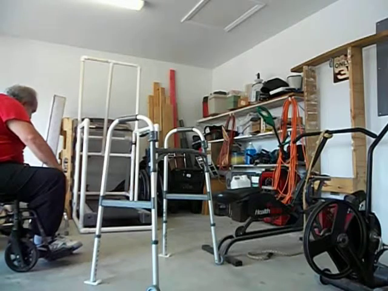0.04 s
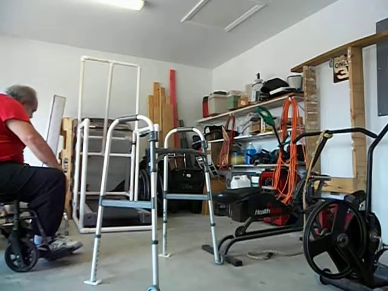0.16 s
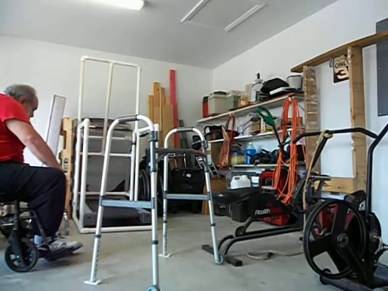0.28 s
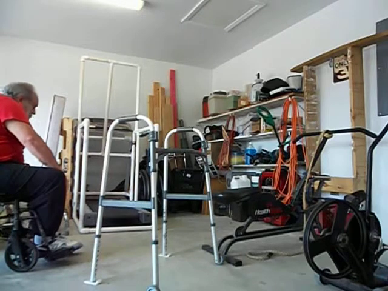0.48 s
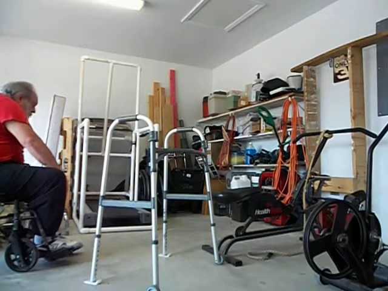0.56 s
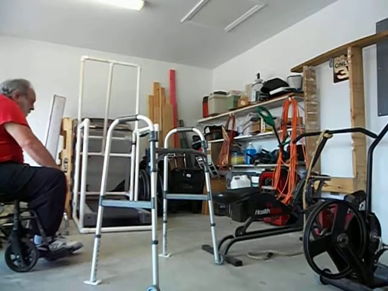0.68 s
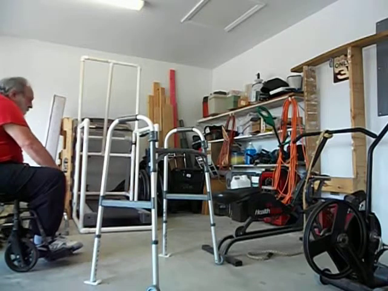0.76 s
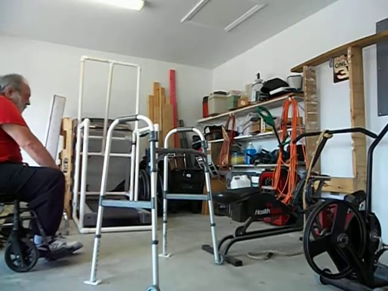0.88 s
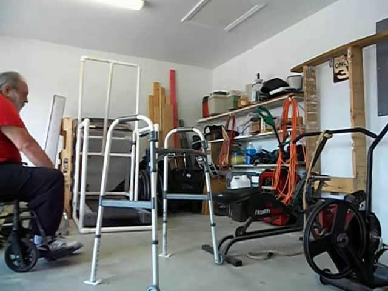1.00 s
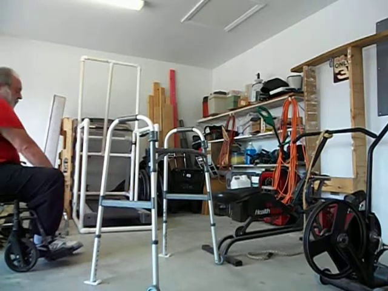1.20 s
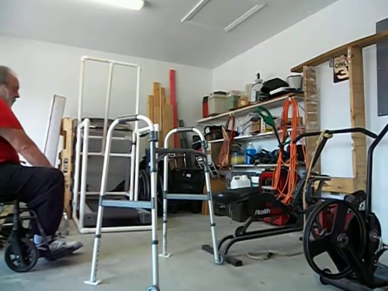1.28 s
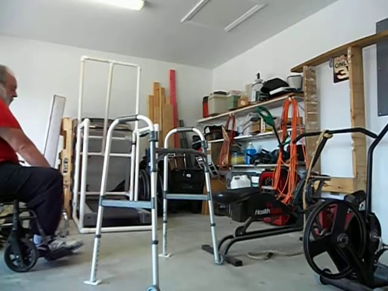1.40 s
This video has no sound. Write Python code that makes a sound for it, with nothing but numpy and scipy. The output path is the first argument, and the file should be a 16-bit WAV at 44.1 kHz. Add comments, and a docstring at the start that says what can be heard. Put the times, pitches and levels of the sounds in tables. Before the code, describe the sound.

A hollow metal clunk from a wheelchair, then knocks and clicks over steady humming.

```python
"""In a garage, a wheelchair is shifted a few metres away: a hollow metal clunk, then frame knocks and
clicks of loose fittings. Each contact is an impulsive source, heard as a short crack, and may excite
the damped normal modes of the tubing and fittings; the footrests take blunt blows. Reflections in the
hard room merge into a reverberant wash, over a steady low motor hum and air noise."""
import sys
import numpy as np
from scipy import signal
from scipy.fft import rfft, irfft
from scipy.io import wavfile
from scipy.ndimage import uniform_filter1d

SR = 44100
rng = np.random.default_rng(int(sys.argv[2]) if len(sys.argv) > 2 else 0)


def dump_mix(stems):
    """Bounce the given channels to the path in sys.argv[1] as a 16-bit WAV at rate SR."""
    frames = np.atleast_2d(stems).T  # one column per channel
    limited = np.clip(frames, -1, 1)  # hard clip at full scale
    pcm = np.round(limited * 32767).astype(np.int16)
    wavfile.write(sys.argv[1], SR, pcm)


N = 63945

# Line spectrum of the motor: f/Hz, level/dB
HUM_LINES = [(73, -49), (146.8, -41), (220.7, -46), (295.5, -44), (360.7, -50)]
# Spectrum of the air noise: f/Hz, relative level/dB
AIR_SPECTRUM = [(15, -50.5), (25, -20.5), (49, -7), (91, -12.5), (130, -5.5), (247, -10), (371, -1),
                (570, -10.5), (918, -12.5), (1110, -14.5), (1310, -14), (2170, -19), (2750, -21),
                (5630, -32), (7500, -33.5), (9750, -104.5), (16500, -120)]
# Reverberation time of the garage: f/Hz, T60/s
REVERB_TIMES = [(200, 0.44), (800, 0.38), (2500, 0.55), (6000, .45)]
# Lag of the left channel: f/Hz, delay/samples
LEFT_DELAY = [(170, .2), (300, 2.4), (1000, 2.6), (7000, 2.8)]
# Steel-on-steel ticks: t/s, level/dB
STEEL_TICKS = [(0.201, -29), (0.5373, -46.5), (0.694, -27), (0.705, -24), (.891, -33)]
# Bands of the contact spectra: f/Hz
CONTACT_BANDS = [220, 700, 1200, 2600, 5600, 7200]
# Contacts of the loose fittings: t/s, then level/dB in each of CONTACT_BANDS
FITTING_CONTACTS = [ (0.198, -30, -28, -40, -34, -35, -31), (.208, -29.5, -40.5, -30.5, -25, -27, -23),
                    (.222, -40, -31.5, -33.5, -23, -27, -32), (.235, -33.5, -25, -19.5, -20, -43, -47.5),
                    (0.535, -33.5, -31, -30, -29.5, -29.5, -34),
                    (0.544, -27, -23.5, -22.5, -35.5, -22, -34.5),
                    (.624, -30.5, -29.5, -31, -35.5, -39.5, -44), (.634, -29, -22, -24, -30.5, -29, -43.5),
                    (0.69, -31, -31, -23.5, -29, -28.5, -39),
                    (.706, -56.5, -25, -47.5, -26.5, -29.5, -29.5),
                    (.881, -48, -31, -40.5, -34.5, -42.5, -41.5), (.895, -53, -47.5, -36.5, -30, -42, -47),
                    (0.955, -34, -37, -36, -33, -38, -46.5)]
# Colouring common to all cracks: f/Hz, gain/dB
CRACK_SPECTRUM = [(100, -11.5), (300, -0.5), (500, 3), (700, 6), (1200, 1.5), (1600, -0.5), (2300, -1.5),
                  (3300, 3), (4200, -1), (5200, 4.5), (6000, 8.5), (7000, 1), (8000, 10)]
# Normal modes of the hollow part, tube frame and steel fittings: f/Hz, level/dB, T60/s
HOLLOW_MODES = [(546.7, 5, 0.2), (504, -10, 0.75), (600, -7.5, 0.56), (867, -10.5, 0.31),
                (1337, -17.5, 0.35), (1331, -12.5, 0.36), (1534, -11.5, 0.28), (2050, -31, 0.3),
                (2115, -14, 0.38)]
TUBE_MODES = [(490.4, -0.5, 0.73), (636, 5, 0.2), (684, -16.5, 0.36), (737, -13.5, 0.068),
              (858, -4.5, 0.14), (963, -1, 0.12), (1101, -4.5, 0.23), (1200, 3, .25), (1367, -20, .35),
              (1600, -8.5, 0.34)]
STEEL_MODES = [(2600, 0, 0.34), (2980, -13, 0.35), (2880, -22, 0.39), (3760, -2, .2), (4960, 2, 0.24),
               (5530, 0.5, 0.33), (5940, 0.5, 0.5), (5820, 0.5, 0.36), (5910, -0.5, .5),
               (5740, -14.5, 0.41)]
# Impacts on the hollow part: t/s, level/dB, T60 factor
HOLLOW_CLUNKS = [(.199, -16.5, 1), (.217, -17.5, 0.63), (.2315, -19.5, 1)]
# Impacts on frame and fittings: t/s, level/dB, T60 factor, most excited f/Hz, fall-off/(dB per octave)
FRAME_KNOCKS = [(.544, -26, 1, 616, 2.5), (.633, -22.5, 1, 700, 5.5), (.886, -27.5, 1, 767, 21.5)]
FITTING_CLINKS = [(0.213, -49, 0.47, 2900, 13), (0.547, -27.5, .85, 5850, 1.5),
                  (.636, -35.5, 0.43, 5200, 3), (0.705, -30.5, 0.8, 3200, 5), (.886, -39, 1, 4950, 22)]
# Blunt blows on the footrests: t/s, level/dB, f/Hz
FOOTREST_BLOWS = [(.2305, -4, 560.6), (.362, -23.5, 563), (.5455, -9.5, 658), (.553, -18, 1117),
                  (.6345, -12, 680), (.6425, -14.5, 791), (.656, -10.5, 689), (.888, -22, 752),
                  (.899, -19, 724), (1.044, -27, 456)]

TIME = np.arange(N) / SR
FREQS = np.arange(N // 2 + 1) * SR / N


def undb(db):
    """Amplitude ratio of a level in decibels."""
    return 10 ** (np.asarray(db) / 20)


def unit(x):
    """Normalisation to an rms of 1."""
    return x / np.sqrt(np.mean(x ** 2))


def curve(hz, points):
    """Interpolation of (f/Hz, value) points over log frequency."""
    p = np.array(points)
    return np.interp(np.log(np.maximum(hz, 1)), np.log(p[:, 0]), p[:, 1])


def decay(t, t60):
    """Exponential damping: 60 dB in t60 seconds."""
    return np.exp(-np.log(1000) * t / t60)


def add(out, x, start):
    """Linear superposition of x on out from the start time."""
    i = int(start * SR)
    out[i:] += x[:N - i]


def drift(rate_hz):
    """Slow random modulation: smoothed steps with an rms of 1."""
    hold = int(SR / rate_hz)
    steps = np.repeat(rng.standard_normal(N // hold + 1), hold)
    return unit(uniform_filter1d(uniform_filter1d(steps, hold), hold)[:N])


def band_noise(hz, width_oct):
    """Narrow-band noise: a Gaussian passband in log frequency."""
    octaves = np.log2(np.maximum(FREQS, 1) / hz)
    passband = np.exp(-2 * (octaves / width_oct) ** 2)
    return unit(irfft(rfft(rng.standard_normal(N)) * passband, N))


def low_pass(x, hz):
    """Band limiting by a steep elliptic filter."""
    return signal.sosfilt(signal.ellip(10, .2, 80, hz, fs=SR, output="sos"), x)


def air_noise(level_db=-32.5, flicker_db=-0.34):
    """Spectrally shaped broadband noise whose level flickers slightly."""
    air = unit(irfft(rfft(rng.standard_normal(N)) * undb(curve(FREQS, AIR_SPECTRUM)), N))
    return air * undb(level_db + flicker_db * drift(18))


def motor_hum(waver_db=1, pitch_spread=.012):
    """A line spectrum: each partial wavers in amplitude and frequency."""
    out = np.zeros(N)
    for hz, db in HUM_LINES:
        amplitude = np.sqrt(2) * undb(db + waver_db * drift(16))
        cycles = np.cumsum(hz * (1 + pitch_spread * drift(14.55))) / SR + rng.random()
        out += amplitude * np.sin(2 * np.pi * cycles)
    return out


def reverb_envelope(hz, build_s=0.0045):
    """Reverberation: reflections build up, then decay at a rate that depends on frequency."""
    return (1 - np.exp(-TIME / build_s)) * decay(TIME, curve(hz, REVERB_TIMES))


def steel_ticks():
    """Brief steel-on-steel contacts radiate bursts of high-frequency noise."""
    out = np.zeros(N)
    for start, db in STEEL_TICKS:
        add(out, undb(db) * decay(TIME, t60=0.03) * band_noise(hz=7130, width_oct=.28), start)
    return out


def contact_cracks(direct_db=-4, rise_s=0.00092):
    """Impulsive contacts are broadband: each band has a direct burst and a reverberant tail."""
    out = np.zeros(N)
    direct = undb(direct_db) * decay(TIME, t60=0.023) * (1 - np.exp(-TIME / rise_s))
    for hz in 100 * 2 ** (np.arange(20) / 3):  # third-octave bands
        noise = band_noise(hz, width_oct=.28)
        envelope = direct + .5 * reverb_envelope(hz)
        for start, *levels in FITTING_CONTACTS:
            db = curve(hz, list(zip(CONTACT_BANDS, levels))) + curve(hz, CRACK_SPECTRUM)
            decorrelated = np.roll(noise, rng.integers(N))
            add(out, undb(db) * envelope * decorrelated, start)
    return out


def modal_ring(modes, t60_factor, focus_hz=1, falloff_db=0, attack_s=0.0025):
    """Free vibration: modes near the focus are excited most; firm contact shortens their decay."""
    out = np.zeros(N)
    for k, (hz, db, t60) in enumerate(modes):
        amplitude = (-1) ** k * undb(db - falloff_db * abs(np.log2(hz / focus_hz)))
        out += amplitude * decay(TIME, t60 * t60_factor) * np.sin(2 * np.pi * hz * TIME)
    return out * (1 - np.exp(-TIME / attack_s))


def ringing_metal(room_db=-11):
    """Impacts excite normal modes; convolution with the room response adds their reflections."""
    direct = np.zeros(N)
    bodies = (HOLLOW_MODES, HOLLOW_CLUNKS), (TUBE_MODES, FRAME_KNOCKS), (STEEL_MODES, FITTING_CLINKS)
    for modes, impacts in bodies:
        for start, db, *excitation in impacts:
            add(direct, undb(db) * modal_ring(modes, *excitation), start)
    room = rng.standard_normal(N) * reverb_envelope(hz=636)
    reflections = signal.fftconvolve(direct, room / np.linalg.norm(room))[:N]
    return direct + undb(room_db) * reflections


def footrest_blows(rise_s=0.0025, room_db=-14):
    """A heavily damped plate vibrates for a few cycles; reverberation sustains its pitch."""
    out = np.zeros(N)
    pulse = TIME / rise_s * np.exp(1 - TIME / rise_s)
    for start, db, hz in FOOTREST_BLOWS:
        direct = pulse * np.sin(2 * np.pi * hz * TIME)
        wash = undb(room_db) * reverb_envelope(hz) * band_noise(hz, width_oct=0.23)
        add(out, undb(db) * (direct + wash), start)
    return out


def scene():
    """Superposition of all sources; a phase lag makes the left channel slightly late."""
    wheelchair = contact_cracks() + footrest_blows() + ringing_metal()
    right = low_pass(wheelchair + air_noise() + motor_hum(), hz=7550) + steel_ticks()
    delay_s = curve(FREQS, LEFT_DELAY) / SR
    left = irfft(rfft(right) * np.exp(-2j * np.pi * FREQS * delay_s), N)
    return np.array([left, right])


def record(dry):
    """Soft saturation rounds the highest peaks; a low-pass filter cuts the top treble."""
    rounded = dry / (1 + (dry / .88) ** 6) ** (1 / 6)
    return low_pass(rounded, hz=8900)


dry = scene()
out = record(dry)
dump_mix(out)
```